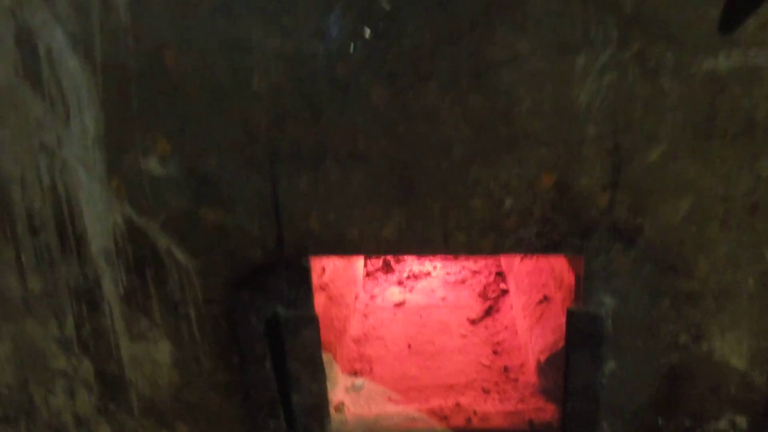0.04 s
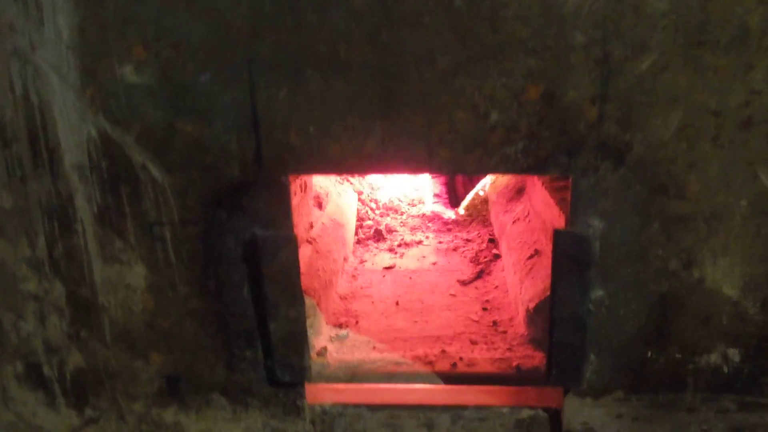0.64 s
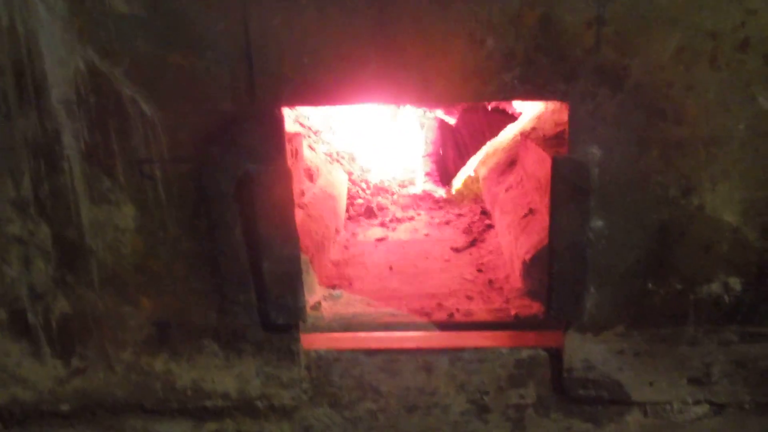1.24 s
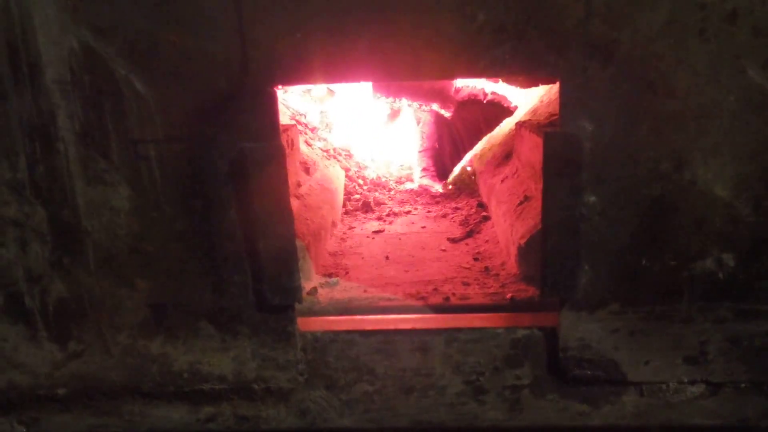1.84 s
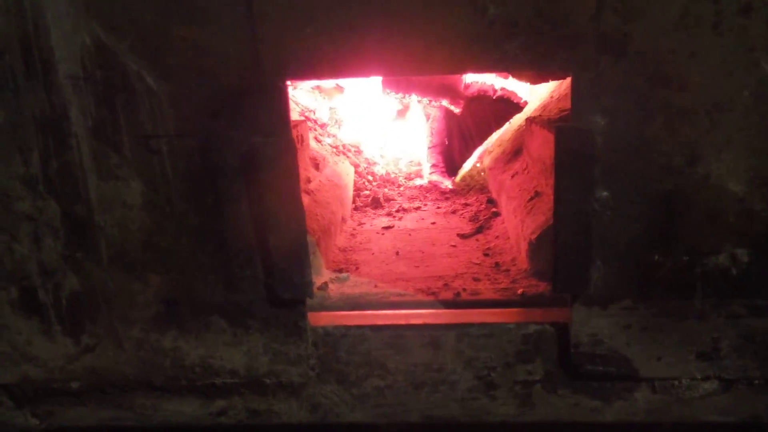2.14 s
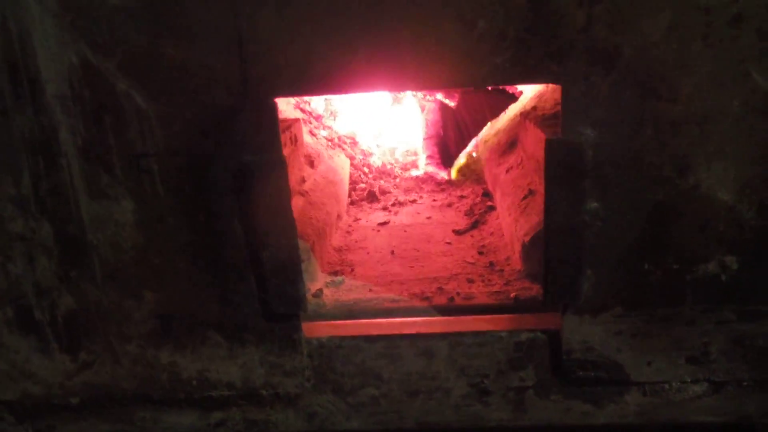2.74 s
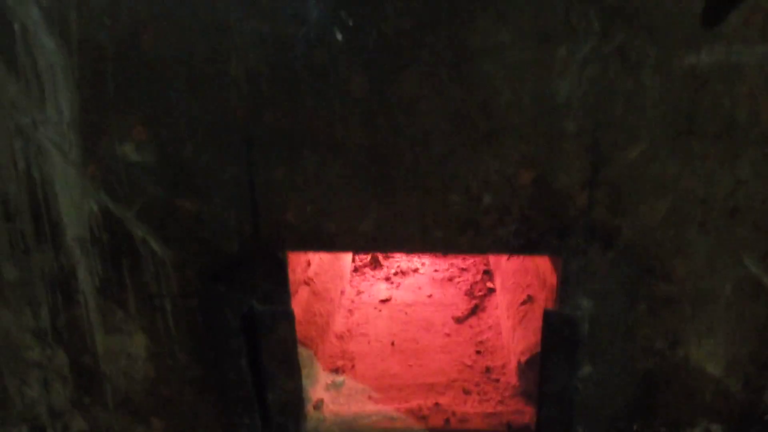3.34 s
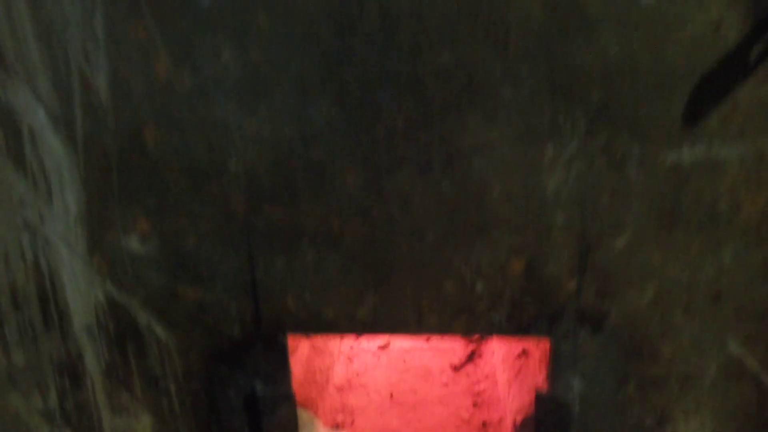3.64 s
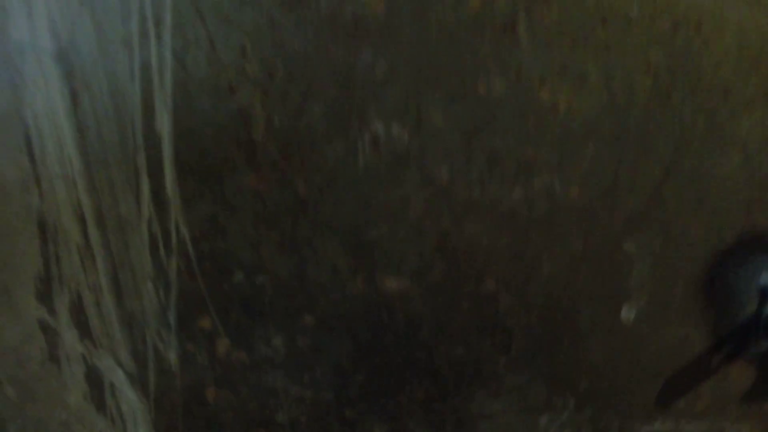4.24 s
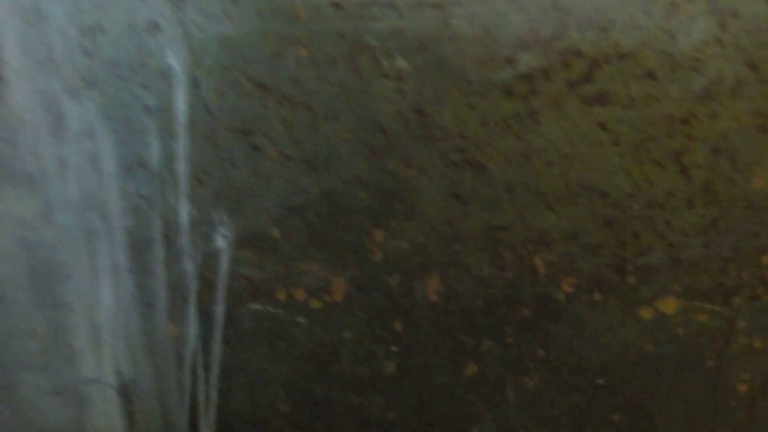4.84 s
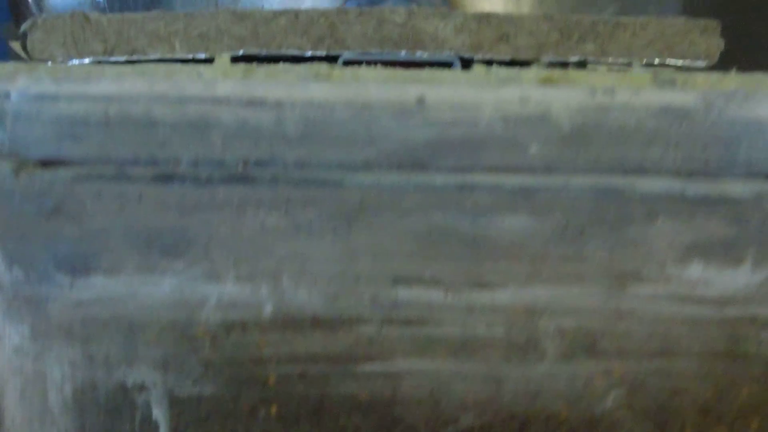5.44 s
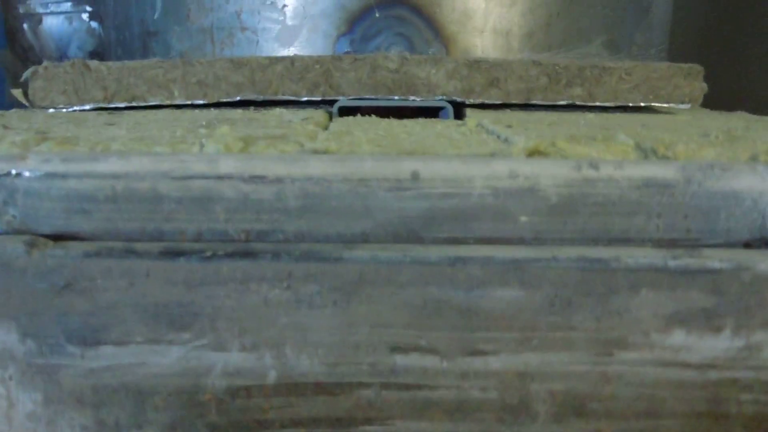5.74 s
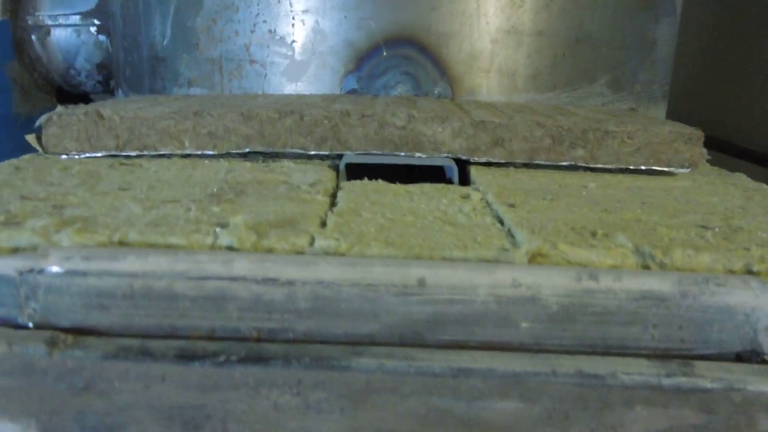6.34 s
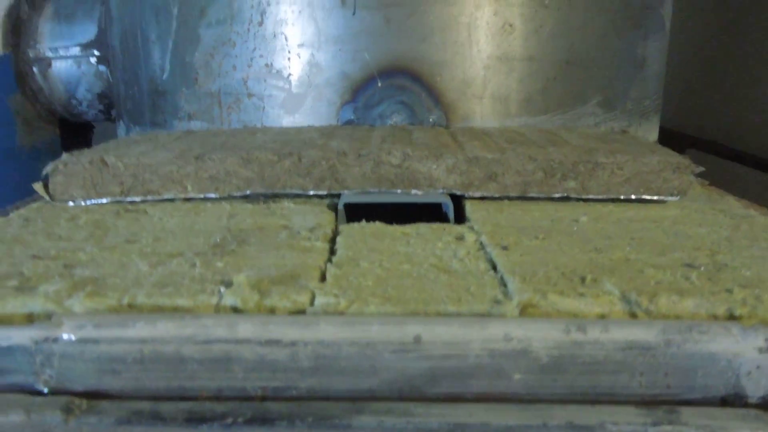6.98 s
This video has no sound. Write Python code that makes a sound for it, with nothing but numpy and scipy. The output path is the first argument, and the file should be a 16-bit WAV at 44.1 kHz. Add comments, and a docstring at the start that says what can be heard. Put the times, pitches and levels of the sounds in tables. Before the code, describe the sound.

Irregular bright snaps and deeper pops come from logs burning in a steel stove, with the microphone near its open door in a small room. Beneath them run a low, fluttering draft and a thin hiss of boiling sap. One loud crack comes early and two more around the middle, with a faint steam squeak between those two. The draft then grows softer as the crackling continues.

```python
"""A wood fire in a steel stove, indoors in a small room, the microphone close to the open ash door.
The draft rumbles in firebox and flue, boiling sap sizzles, and the logs snap and crack;
each crack rings the firebox and dies away in the room. Steam squeaks once out of a log.
The loudest cracks overload the microphone."""
import sys
import numpy as np
from scipy import signal
from scipy.fft import rfft, irfft, next_fast_len
from scipy.io import wavfile
from scipy.ndimage import uniform_filter1d, map_coordinates

SR = 44100
rng = np.random.default_rng(int(sys.argv[2]) if len(sys.argv) > 2 else 0)


def file_out(sig):
    """Save sig as 16-bit WAV at sys.argv[1]."""
    # one column per channel
    cols = np.atleast_2d(sig).T
    # limit, then scale
    lim = np.clip(cols, -1, 1)
    pcm = np.round(lim * 32767).astype(np.int16)
    wavfile.write(sys.argv[1], SR, pcm)


N = 313533
TOP_HZ = 14350  # band limit of the microphone

# how hard the sap sizzles: t/s, relative level/dB
SAP_LEVEL = [(0.0, -54.5), (0.6, -56.5), (1.05, -56.5), (1.6, -54), (1.9, -55), (3.4, -55), (4.55, -58),
             (5.0, -57.5), (7.11, -57.5)]
# stereo image of sounds close to the microphone: f/Hz, left-right likeness
CLOSE_LIKENESS = [(500, 1), (2500, 0.98), (5000, 0.9), (9000, 0.26), (13000, 0.074)]


def amp(db):
    """Decibels to gain."""
    return 10 ** (np.asarray(db) / 20)


def unit(x):
    """Scale to rms 1."""
    return x / np.sqrt(np.mean(x ** 2) + 1e-20)


def unit_energy(x):
    """Scale to a mean energy of 1 per channel."""
    return unit(x) / np.sqrt(x.shape[-1])


def along(points, hz):
    """Interpolate (f/Hz, value) points on a log frequency axis."""
    f, value = np.transpose(points)
    return np.interp(np.log(hz + 1), np.log(f + 1), value)


def curves(rows):
    """One value per sample for each column after t/s."""
    times, *columns = np.transpose(rows)
    return [np.interp(np.arange(N) / SR, times, column) for column in columns]


def wobble(rate):
    """A smooth random curve, rate knots a second."""
    knots = rng.standard_normal(int(N * rate / SR) + 4)
    return map_coordinates(knots, [np.arange(N) * rate / SR])


def filtered(x, response):
    """Filter x by a gain given as a function of frequency."""
    n = x.shape[-1]
    padded = next_fast_len(n + n // 4)
    return irfft(rfft(x, padded) * response(np.fft.rfftfreq(padded, 1 / SR)), padded)[..., :n]


def peaks(modes, hz):
    """Gain of resonances standing on a flat response."""
    excess = sum((amp(db) ** 2 - 1) / (1 + (2 * (hz - centre) / width) ** 2)
                 for centre, width, db in modes)
    return np.sqrt(1 + excess.clip(-.5))


def ring(x, gain, size=16384):
    """Colour a short sound causally, so that resonances ring after it."""
    cepstrum = irfft(np.log(np.maximum(gain(np.fft.rfftfreq(size, 1 / SR)), 1e-6)))
    cepstrum[1:size // 2] *= 2  # fold to minimum phase
    cepstrum[size // 2 + 1:] = 0
    return irfft(rfft(x, size) * np.exp(rfft(cepstrum)))


def spread(pair, likeness):
    """Blend two unrelated signals into left and right of a given likeness."""
    turn = lambda hz: np.arccos(np.clip(along(likeness, hz), -1, 1)) / 2
    mid, side = filtered(pair, lambda hz: np.array([np.cos(turn(hz)), np.sin(turn(hz))]))
    return np.array([mid + side, mid - side])


def rush(gain):
    """Diffuse stereo noise of rms 1, coloured by gain."""
    # stereo image of diffuse sound: f/Hz, left-right likeness
    diffuse_likeness = [(60, 0.994), (130, .985), (290, 0.89), (630, 0.49), (1400, 0.44), (3000, 0.48),
                        (7000, 0.04), (14000, 0.23)]
    return unit(filtered(spread(rng.standard_normal((2, N)), diffuse_likeness), gain))


def steady(x, size=5000):
    """Even out the slow swells of a noise."""
    power = uniform_filter1d(uniform_filter1d(np.mean(x ** 2, axis=0), size), size)
    return unit(x / np.sqrt(np.abs(power) + 1e-6))


def add(out, start_s, sound):
    """Mix a short stereo sound into out."""
    part = out[:, round(start_s * SR):][:, :sound.shape[1]]
    part += sound[:, :part.shape[1]]


def draft(throb_gain_db=0.5, flutter_gain_db=5.0, air_db=-56, throb_swing_db=2.06, flutter_swing_db=2.6):
    """The draft throbs in the flue, the flames flutter above it, and air rushes through the door."""
    # the draft surges, then fades as the microphone rises away from the door:
    # t/s, relative throb level/dB, relative flutter level/dB
    surges = [(0.0, -42, -53.5), (0.6, -41.5, -56), (0.9, -42.5, -55), (1.25, -40, -56), (1.58, -39, -54.5),
              (1.82, -45, -57.5), (2.07, -35, -55.5), (2.33, -44, -52.5), (2.55, -39.5, -57),
              (2.77, -44, -51), (3.2, -37.5, -54.5), (3.7, -43.5, -54), (4.05, -40, -60.5),
              (4.5, -42.5, -61), (5.0, -48.5, -56.5), (5.7, -47, -60), (7.11, -48.5, -60)]
    # air resonances of stove and flue: f/Hz, width/Hz, gain/dB
    flue_modes = [(75.4, 15.2, 13), (162.8, 16.2, 7), (280.6, 10.3, 14.5), (500, 64, 3.5), (640, 100, 3.5),
                  (883, 160, 7.5)]
    # spectra of throb, flames and inrushing air ahead of those resonances: f/Hz, relative level/dB
    throb_spectrum = [(10, -29), (25, 5.5), (35, -3), (55, -3), (90, -1), (130, -7), (180, -13),
                      (225, -25.5), (330, -28), (900, -47)]
    flame_spectrum = [(70, -36), (140, 7.5), (185, 5), (225, -6.5), (290, -0.5), (360, -5), (440, 0),
                      (510, -17), (620, -6), (900, -58)]
    air_spectrum = [(10, -21), (23, -3), (30, -16), (60, -23), (300, -35), (500, 4), (900, -2), (1400, 2.5),
                    (2800, -1.5), (4500, -6), (8000, -44), (14500, -40)]
    through_stove = lambda spectrum: rush(lambda hz: amp(along(spectrum, hz)) * peaks(flue_modes, hz))
    throb_db, flutter_db = curves(surges)
    throb_level = amp(throb_db + throb_gain_db + throb_swing_db * wobble(13))
    throb = throb_level * steady(through_stove(throb_spectrum))
    flutter_level = amp(flutter_db + flutter_gain_db + flutter_swing_db * wobble(15))
    flutter = flutter_level * steady(through_stove(flame_spectrum))
    return throb + flutter + amp(air_db) * through_stove(air_spectrum)


def sizzle_moments(chance, crowding=2.6):
    """Turn chances of 0-1 into sample positions that crowd where the sap sizzles most."""
    sizzle_db, = curves(SAP_LEVEL)
    rate = amp(crowding * sizzle_db) ** 2
    return np.searchsorted(np.cumsum(rate) / np.sum(rate), chance).clip(0, N - 1)


def sap(tick_db=-3.5, hiss_db=1.7, wet=0.16, splatter_t60=0.012, count=220, size=512):
    """Boiling sap hisses and bursts in tiny ticks, each a short splatter at its own pitch."""
    # colour of hiss and ticks: f/Hz, gain/dB
    sizzle_spectrum = [(2000, -12), (5000, -3), (8500, -4), (11800, -1), (14500, -3)]
    sizzle_db, = curves(SAP_LEVEL)
    t, hz = np.arange(size) / SR, np.fft.rfftfreq(size, 1 / SR)
    when, strength, colour = rng.random((count, 3)).T
    gains = amp(4 * np.minimum(-np.log(1 - strength), 2.8))  # many weak, a few strong
    pitch_hz = 7000 + 7000 * np.sqrt(colour[:, None])
    splatter = rng.standard_normal((2, count, size)) * amp(-60 * t / splatter_t60)
    grains = irfft(rfft(splatter) / (1 + 1j * (hz - pitch_hz) / 1100)) * gains[:, None]
    places = (sizzle_moments(when)[:, None] + np.arange(size)).ravel()
    pair = np.array([np.bincount(places, channel.ravel(), N)[:N] for channel in grains])
    bursts = spread(pair, CLOSE_LIKENESS)
    room = signal.fftconvolve(bursts, room_tail(), axes=1)[:, :N]
    bright = lambda f: amp(along(sizzle_spectrum, f)) * (f < TOP_HZ)
    ticks = amp(tick_db) * unit(filtered(bursts + wet * room, bright))
    hiss = amp(hiss_db + 0.495 * wobble(2.9)) * rush(bright)
    return amp(sizzle_db) * (ticks + hiss)


def room_tail(rise_s=0.0029, size=12288):
    """The walls of the small room answer within milliseconds, and the treble dies first."""
    # reverberation time: f/Hz, t60/s
    room_t60 = [(300, 0.2), (1000, 0.19), (3500, 0.19), (8000, .19), (14000, 0.15)]
    # stereo image of the reflections: f/Hz, left-right likeness
    room_likeness = [(300, 1), (900, 0.97), (2500, 1), (6000, 0.87), (12000, 0.48)]
    hz, t, noise = signal.stft(rng.standard_normal((2, size)), SR, nperseg=256)
    decay = amp(-60 * t / along(room_t60, hz)[:, None])
    tail = signal.istft(noise * decay, SR, nperseg=256)[1][:, :size]
    build_up = 1 - np.exp(-(np.arange(size) / SR / rise_s) ** 2)
    return unit_energy(spread(tail, room_likeness) * build_up)


def crack(knock_db, body_db, snap_db, room_db, piece_hz, piece_db=5.5, piece_q=6,
          splinter_t60=0.03, grain_db=1.5, wet_db=1, size=12288):
    """One fracture: a snap, a burst of splintering fibres and the room, coloured by wood and firebox."""
    # firebox resonances that a crack rings: f/Hz, width/Hz, gain/dB
    firebox_modes = [(290, 14, 14), (530, 15.7, 17), (624, 36, 16), (861, 41, 15.5), (974, 39, 10.5),
                     (1263, 28, 9), (1636, 38, 6.5), (1964, 62, 5), (2230, 25, 7), (2560, 190, 3.5),
                     (3350, 490, 4.5), (4990, 940, 2), (7340, 130, 4.5)]
    t = np.arange(size) / SR
    # fibres break one after another, each with its own strength
    fibres = rng.standard_normal((2, size)) * amp(grain_db * rng.standard_normal(size // 8).repeat(8))
    splinters = unit_energy(spread(fibres, CLOSE_LIKENESS) * amp(-60 * t / splinter_t60))
    snap = amp(snap_db) * (t == 0)
    direct = (splinters + snap) / np.hypot(1, amp(snap_db))
    room = amp(room_db + wet_db) * room_tail()
    # low knock, mid body and an edge at 6.5 kHz that rises with the body: f/Hz, gain/dB
    tone = [(120, knock_db - 30.5), (280, knock_db - 15), (410, knock_db - 10.5), (520, knock_db - 10.5),
            (700, knock_db - 7.0), (1300, (knock_db + body_db) / 2 - 5.0),
            (2000, body_db - 2.5), (2700, body_db - 0.5), (6500, 0.25 * body_db - 5.5),
            (10000, -4.0), (12500, -2.0), (14500, -10.0), (18000, -17)]
    # the piece that breaks adds its own short ring to that of the firebox
    modes = list(firebox_modes) + [(piece_hz, piece_hz / piece_q, piece_db)]
    sound = ring(direct + room, lambda hz: amp(along(tone, hz)) * peaks(modes, hz))
    return sound / np.sqrt(np.sum(sound[:, :530] ** 2) / 2)  # energy 1 in the first 12 ms


def crackles(count=40, over_sap_db=36, scatter_db=1, tone_scatter_db=2.5, scatter_octaves=0.59):
    """Faint crackles come at random, denser and louder where the sap sizzles more."""
    sizzle_db, = curves(SAP_LEVEL)
    places = sizzle_moments((np.arange(count) + rng.random(count)) / count)
    out = np.zeros((2, N))
    for i, (strength, depth, smallness) in zip(places, rng.standard_normal((count, 3)).clip(-2, 2)):
        deeper_db = tone_scatter_db * depth
        level_db = sizzle_db[i] + over_sap_db + scatter_db * strength
        sound = crack(knock_db=-5.5 + deeper_db, body_db=-18 + deeper_db, snap_db=0, room_db=-13,
                      piece_hz=8500 * 2 ** (scatter_octaves * smallness), piece_db=12)
        add(out, i / SR, amp(level_db) * sound)
    return out


def logs(gain_db=1):
    """The burning logs crack, from bright snaps to deep pops."""
    # the distinct cracks, levels relative: t/s, level/dB, knock at 700 Hz/dB, body at 2.7 kHz/dB,
    # snap over splintering/dB, room/dB, f/Hz of the breaking piece
    fractures = [(0.1681, -12.5, -26, -21, 0, -24, 6500), (0.2432, -14, 5, -8, -8, -6, 8500),
                 (0.2856, -15, -17, -26, 4, -11, 12500), (0.2934, 0, -8, -6.5, -5.5, -9.5, 2480),
                 (0.4276, -17.5, 5, -4, -2, -6, 12000), (0.4785, -10.5, -12, -28, 1, -16, 13100),
                 (0.5362, -12, -15, -30, 7, -11, 11000), (0.562, 4, -34, -14.5, 4, -17.5, 11500),
                 (0.6975, 6, 0.5, 3, 4.5, -18, 1800), (0.7605, -4.5, -7.5, -4.5, 0, -8.5, 4500),
                 (0.7833, -6, -4, -2, -24, -10, 1860), (1.1335, -13, -7, -20, 4, -13, 12700),
                 (1.2494, 17, -13, -11, -5.5, -10.5, 11400), (1.4005, -13.5, 3, -2, -11, -12, 2080),
                 (1.6206, -13, -23, -20, 1, 1, 12000), (1.6423, -14.5, -22, -17, -17, -10, 5200),
                 (1.6735, -6, -14, -28, 7, -26, 12900), (1.8264, -15, -6, -16, -11, -23, 1920),
                 (2.0278, -10.5, -8, -6, 0, -6.5, 1930), (2.1473, -5.5, -25, -19.5, 1.5, -18, 12200),
                 (2.2716, -7, -6, -6.5, -9, -6.5, 12000), (2.3778, 5, -16, -13, -4, -6.5, 12300),
                 (2.4088, -5, -7, -1, 1, -18, 11300), (2.4315, 5, -6, -8.5, -9.5, -14, 3230),
                 (2.8053, -6, 1, 0, -8, -13, 4920), (2.8892, -7.5, 9, 3, -9, -9.5, 2090),
                 (3.0183, -3, -4.5, 7, 7, -18, 1490), (3.191, 18.5, -3.5, 2.5, 2, -16, 3350),
                 (3.2413, -0.5, -6.5, -11.5, -12, -8.5, 2460), (3.2944, -11, 8, 1, -3, -5.5, 2080),
                 (3.4898, -4, -2.5, -2.5, -18, -7.5, 11500), (3.5224, -15, 15, 3, -8, -15, 2260),
                 (4.0469, -10, -17, -29, 3, -13, 12300), (4.3216, 17.5, -18, -13.5, -7, -9.5, 4960),
                 (4.6685, 3.5, -12.5, -16.5, -13, -6, 2520), (4.7355, 7, -22.5, -14.5, -27, -4, 12300),
                 (4.8265, -14, -1.5, -0.5, -14, -5, 2830), (4.981, -19.5, -4, -3, -13, -2, 2530),
                 (5.0751, 6.5, -26, -19, -23, -5, 10400), (5.1012, -8, 9, 0.5, -17, -3.5, 3560),
                 (5.2022, -19.5, 11.5, -7, 4, -6, 2390), (5.406, -18, 23, 19, -20, -26, 3630),
                 (5.4391, -6.5, -28, -18, -2, -5, 10500), (5.7791, 7.5, -5.5, -6, 3, -10.5, 9600),
                 (5.959, -18, -20, -4, -17, -5, 7060), (6.016, -17, -29, -8, -12, -5, 3000),
                 (6.1097, -14, -27, -16, 6, 3, 11300), (6.5319, -7.5, -23, -15, -15, -5, 12600),
                 (6.607, -13, 4, -10, -9, -3.5, 11300), (6.9938, -17.5, 3, -26, -10, -16, 12000),
                 (7.0529, -1.5, -7.5, -6.5, -11, -6.5, 10500)]
    out = np.zeros((2, N))
    for start_s, level_db, knock_db, body_db, snap_db, room_db, piece_hz in fractures:
        add(out, start_s, amp(level_db + gain_db) * crack(knock_db, body_db, snap_db, room_db, piece_hz))
    return out


def steam_squeak(peak_s=3.773, rise_s=0.087, fall_s=0.19, level_db=-54.5, stutter_db=5.0, stutter_hz=65):
    """Steam escapes through a narrow split in a log: a resonant hiss that swells, stutters and fades."""
    # resonances of the squeak: f/Hz, width/Hz, gain/dB
    split_modes = [(1380, 300, -1), (2490, 89, 16), (2920, 150, 13)]
    # broad hiss of the jet: f/Hz, relative level/dB
    jet_spectrum = [(500, -27), (1100, 7), (3000, -6), (6000, -8), (12000, -25)]
    t = np.arange(N) / SR - peak_s
    swell = np.exp(-(t / np.where(t < 0, rise_s, fall_s)) ** 2 / 2)
    jet = rush(lambda hz: amp(along(jet_spectrum, hz)) * peaks(split_modes, hz))
    return amp(level_db + stutter_db * wobble(stutter_hz)) * swell * jet


def scene():
    """The fire from close to the ash door: draft, sap, steam and cracking logs."""
    return draft() + sap() + steam_squeak() + crackles() + logs()


def record(dry, ceiling=0.9):
    """The microphone rounds off the tallest peaks and cuts steeply above its band limit."""
    rounded = dry / (1 + np.abs(dry / ceiling) ** 5) ** (1 / 5)
    return filtered(rounded, lambda hz: 1 / np.sqrt(1 + (hz / TOP_HZ) ** 150))


dry = scene()
out = record(dry)
file_out(out)
```